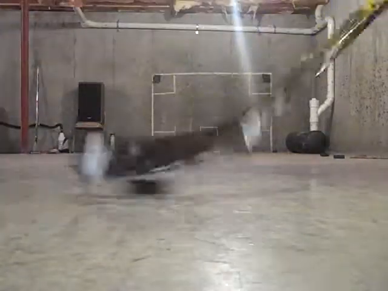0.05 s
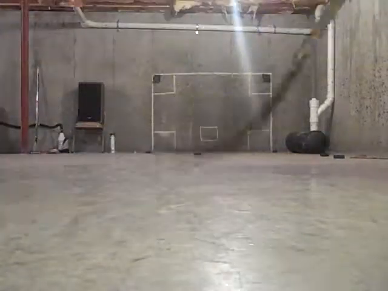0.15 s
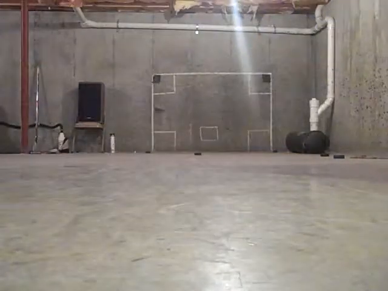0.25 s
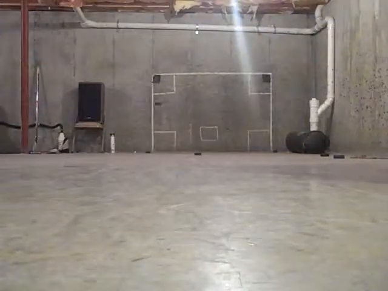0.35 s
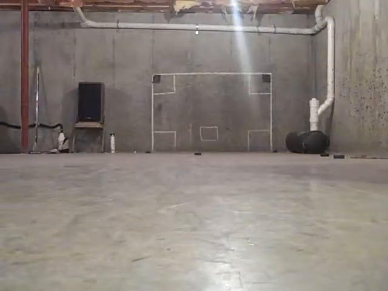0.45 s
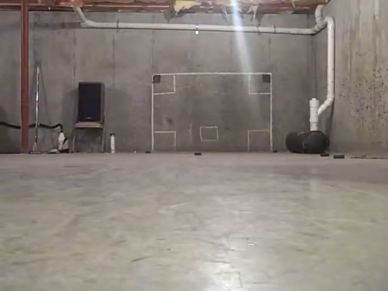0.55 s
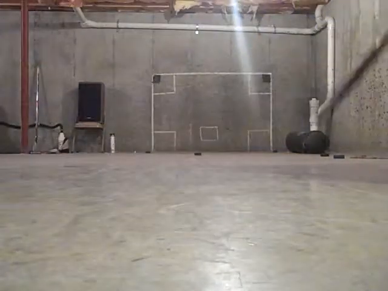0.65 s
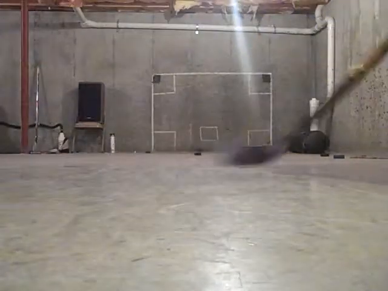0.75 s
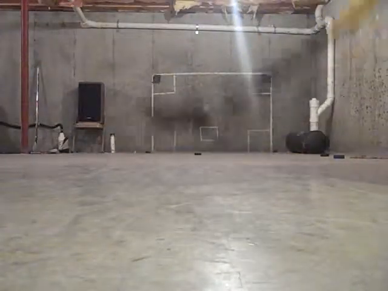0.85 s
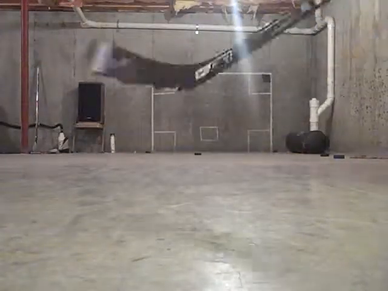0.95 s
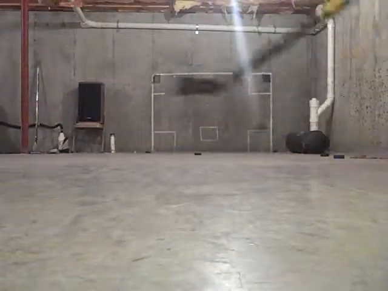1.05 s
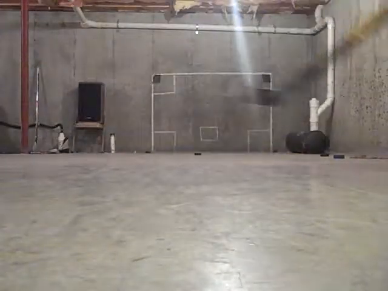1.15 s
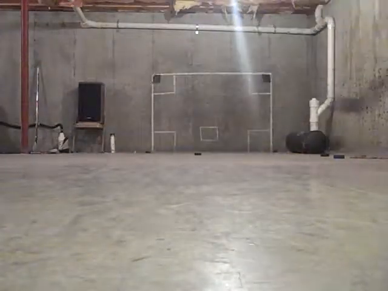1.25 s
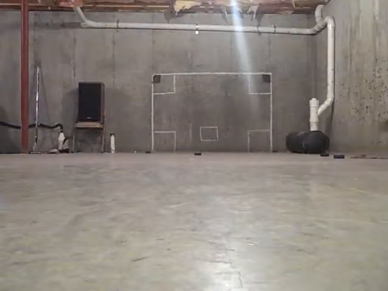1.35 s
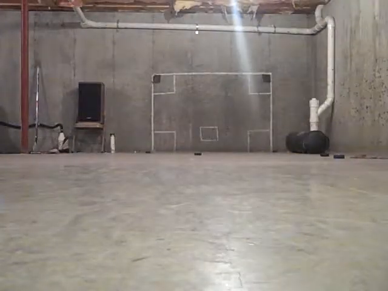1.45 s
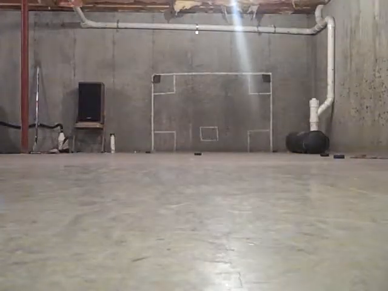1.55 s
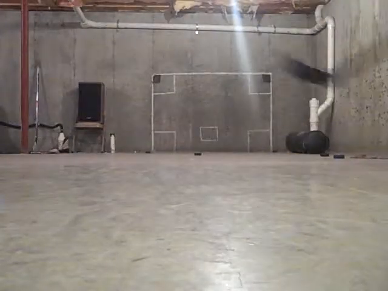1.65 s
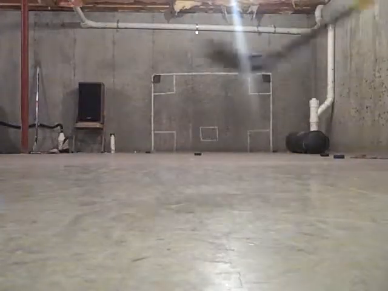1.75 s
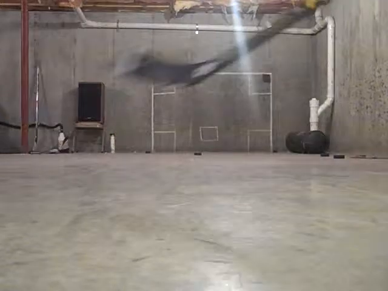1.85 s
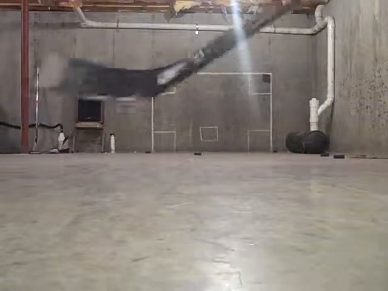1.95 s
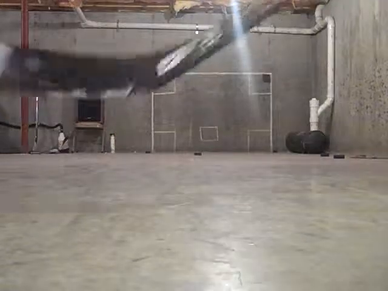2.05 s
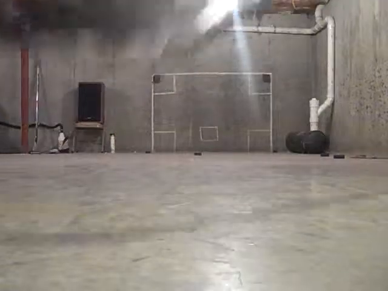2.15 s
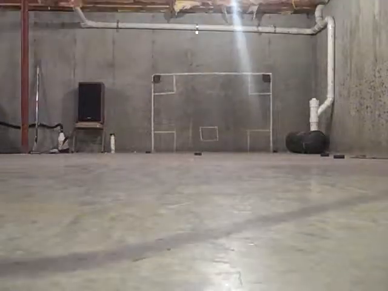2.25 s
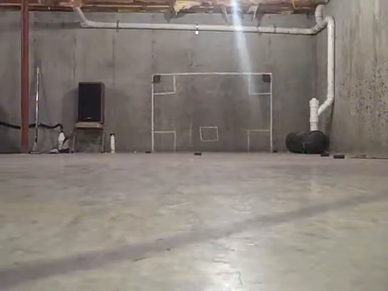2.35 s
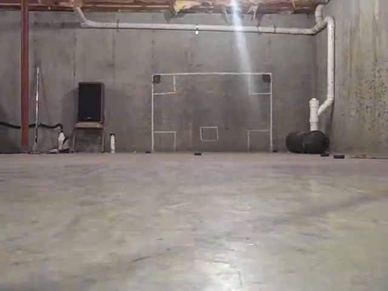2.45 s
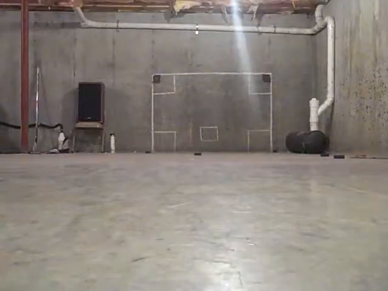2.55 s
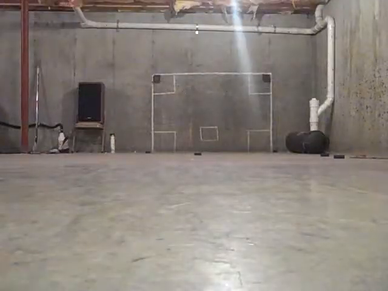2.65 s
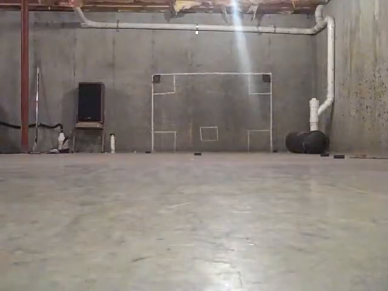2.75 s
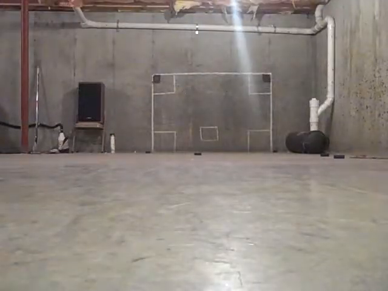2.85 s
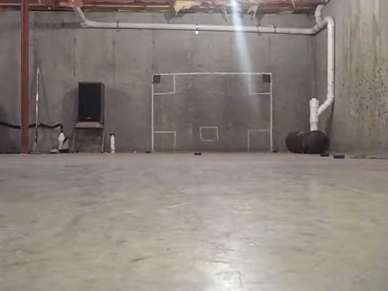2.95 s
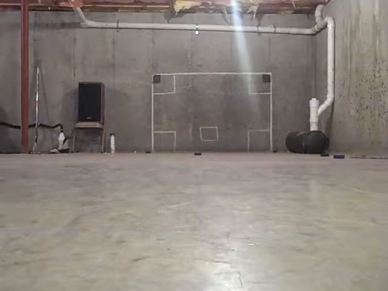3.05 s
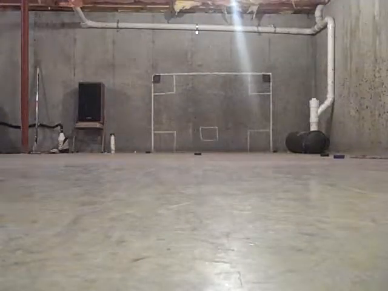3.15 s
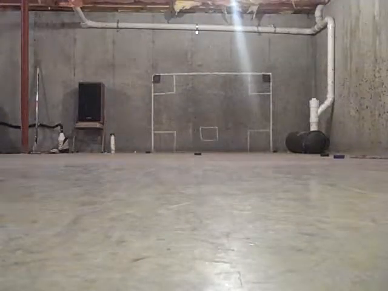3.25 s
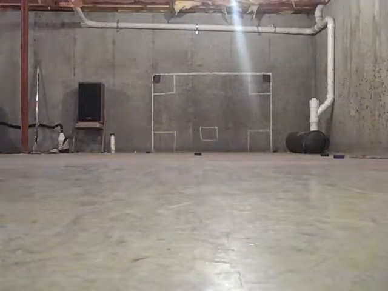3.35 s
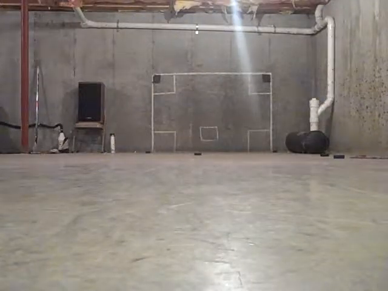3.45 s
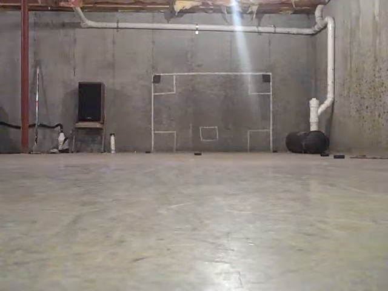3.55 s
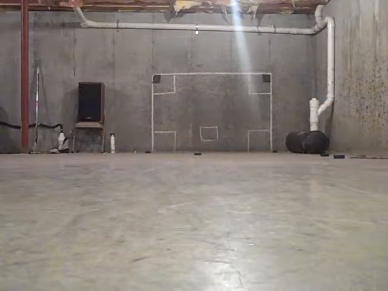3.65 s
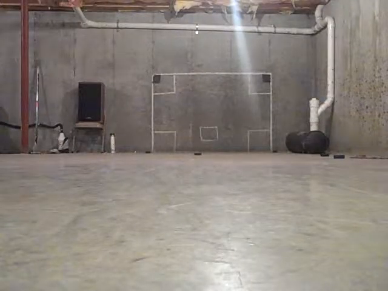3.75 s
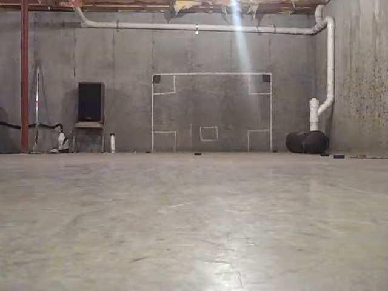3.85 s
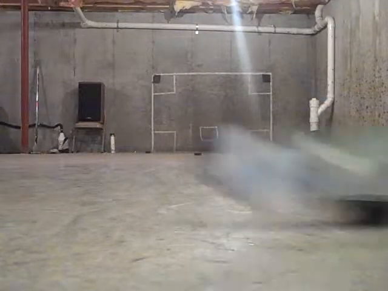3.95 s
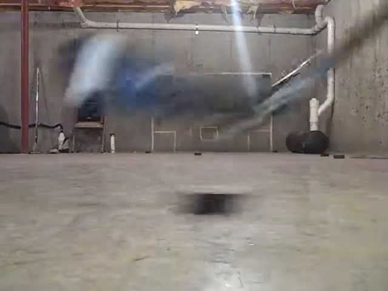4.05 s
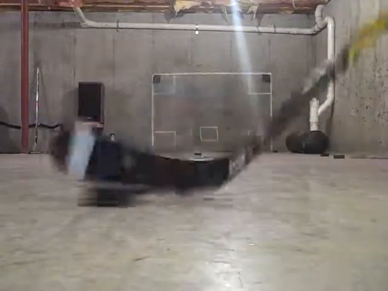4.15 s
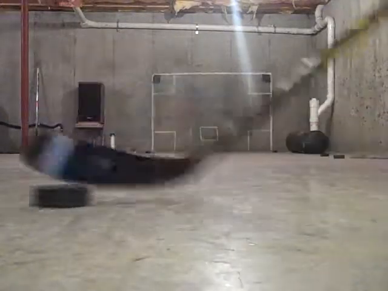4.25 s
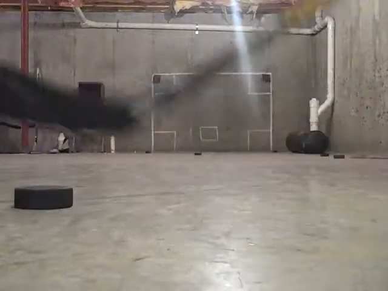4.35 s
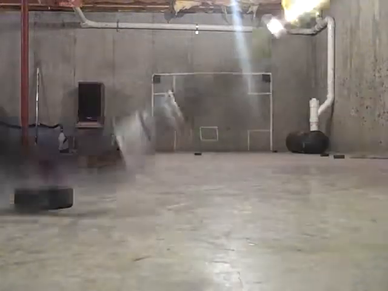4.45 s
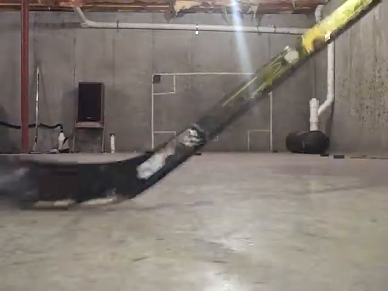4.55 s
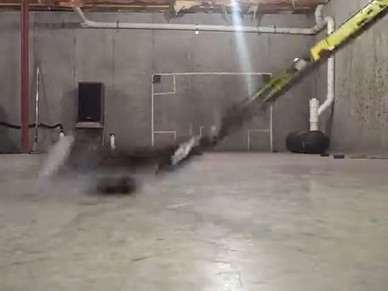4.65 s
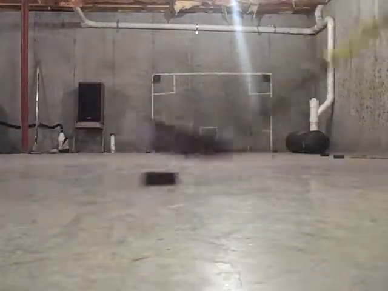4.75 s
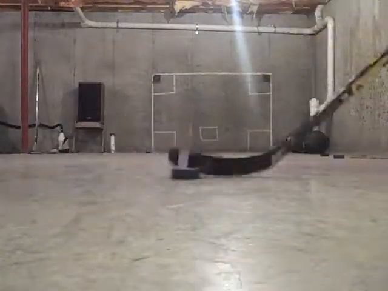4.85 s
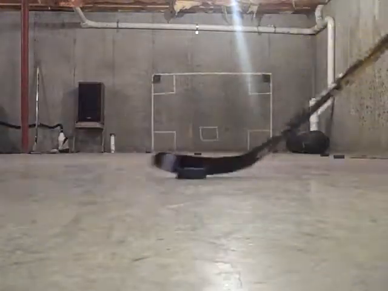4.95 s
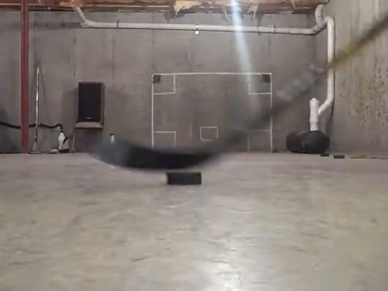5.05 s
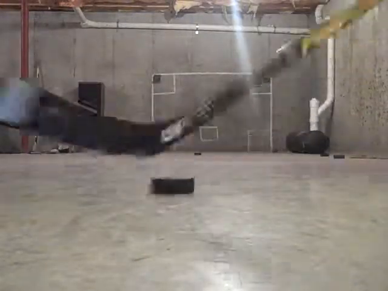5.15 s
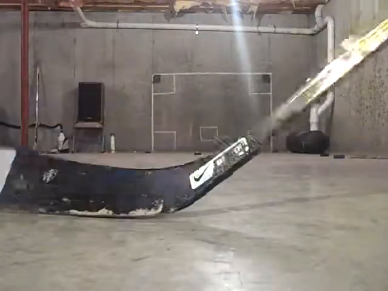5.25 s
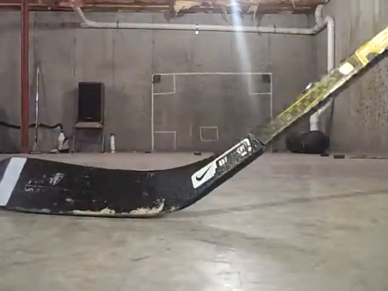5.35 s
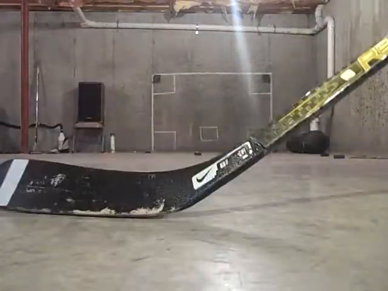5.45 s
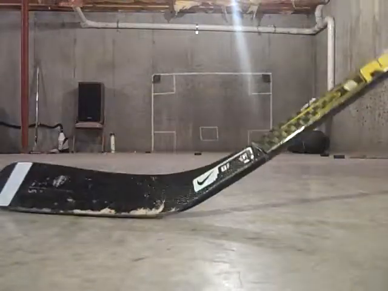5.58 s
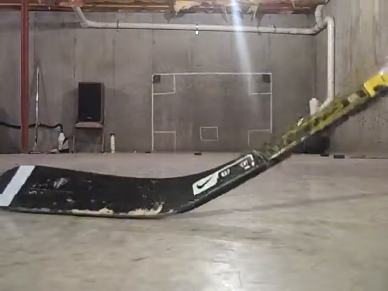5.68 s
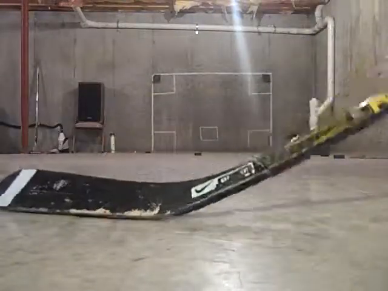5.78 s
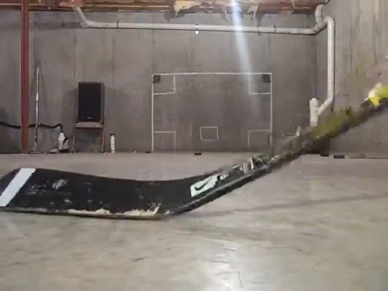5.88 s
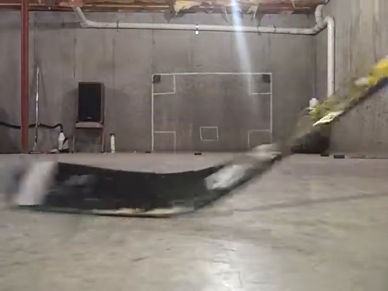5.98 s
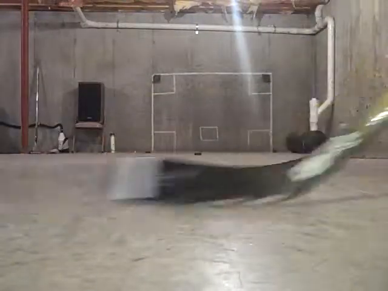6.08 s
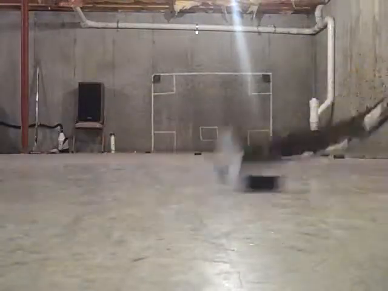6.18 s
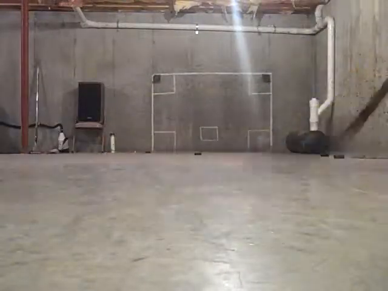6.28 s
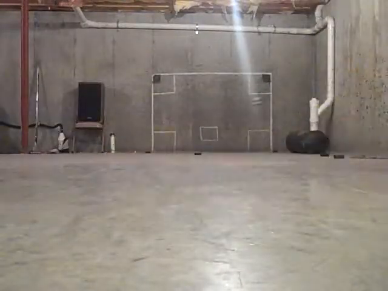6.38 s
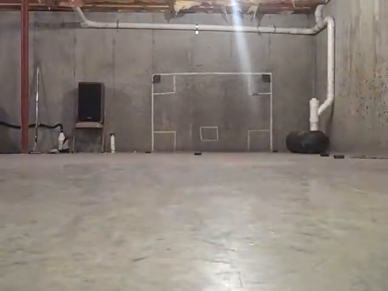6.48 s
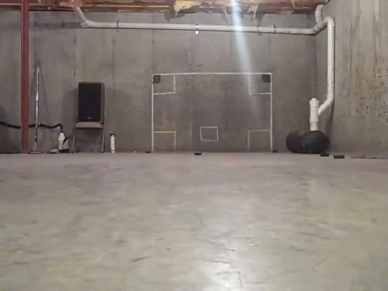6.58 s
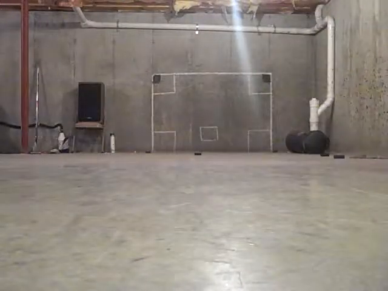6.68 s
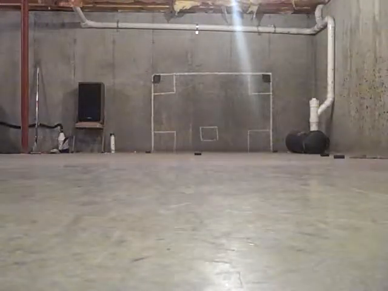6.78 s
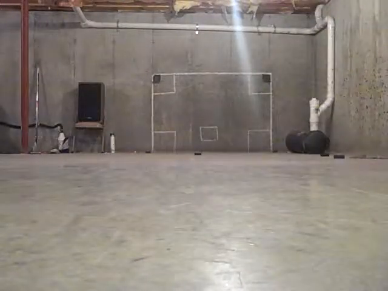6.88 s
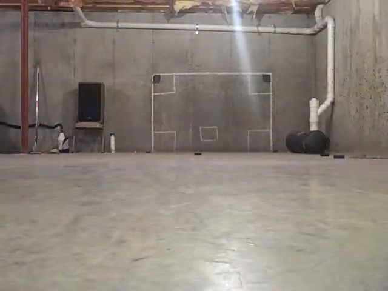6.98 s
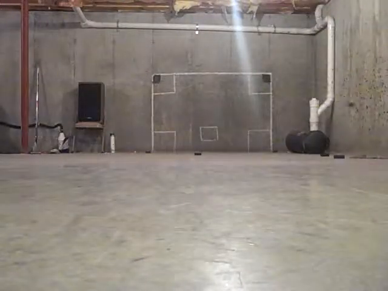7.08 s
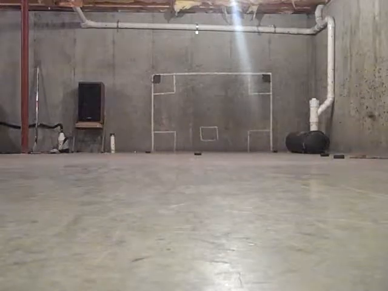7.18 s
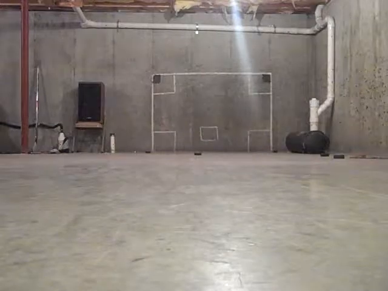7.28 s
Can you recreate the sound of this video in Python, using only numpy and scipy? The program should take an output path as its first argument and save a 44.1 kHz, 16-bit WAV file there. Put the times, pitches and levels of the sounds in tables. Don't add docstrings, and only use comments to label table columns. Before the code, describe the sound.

A small microphone lies on a bare concrete basement floor beside a hockey stick. From 0 s the blade hisses through a gritty sweep, slaps and skids at 0.2, and a puck bangs the far wall, with a heavy rebound near 0.55. Hard clicks and low thuds follow at 0.8 and 1.3, a board-like knock at 1.6, then small bounces and faint glides until 2.9. Sharp clacks at 3.25 lead to a quick scrape at 3.4 and soft sliding. Between 3.9 and 5.5 come close slaps and puck knocks, the loudest around 4.3, 4.6 and 5.3, distorting with gusts of air. A rough wind-up scrapes from 6.0 to 6.25; a violent slap at 6.33 sends pucks to the wall at 6.4 and 6.7. A hollow box booms near 6.87, a pipe rings faintly, and a last bounce lands at 7.3. Flutter echoes and a short tail sit over faint hum and hiss.

```python
import sys
import numpy as np
from scipy import signal
from scipy.fft import rfft, irfft
from scipy.io import wavfile
from scipy.ndimage import uniform_filter1d

SR = 44100
rng = np.random.default_rng(int(sys.argv[2]) if len(sys.argv) > 2 else 0)


def to_linear_factor(level_db):
    exponent = np.asarray(level_db, float) / 20
    return 10 ** exponent


def digitize_waveform(pressure):
    field = np.atleast_2d(pressure).T
    bounded = np.clip(field, -1, 1)
    quanta = np.round(bounded * 32767).astype(np.int16)
    wavfile.write(sys.argv[1], SR, quanta)


N = 322812

# hz, level_db, t60_s
RUBBER = [(540, 3.5, 0.0028), (900, -10.5, 0.029), (1274, -3, 0.01), (2330, -4, 0.00088)]
# ratio to the pitch, level_db
SLAB = [(.55, -9.5), (.75, -5), (1, 4), (1.2, -4), (1.5, -6.5), (1.9, -7.5), (2.5, -9.5)]
# hz, level_db
CLICK_KNOCK = [(100, -22.5), (300, -11.5), (600, -1), (1000, 0.5), (1600, -2.5), (2500, -12.5),
               (5000, -24.5)]
# hz, level_db
FAR_DULL = [(100, 0), (8500, 0), (10500, -7), (14000, -14)]
# hz, level_db
CAPSULE = [(30, -6.5), (3500, 1.5), (5500, 1.5), (7000, 7), (8100, 6.5), (9200, -2), (14000, -12.5)]
# hz, level_db, t60_s
PIPE = [(3042, -5, .4), (3254, 0, .55), (3261, -5, .55), (3512, -2, .55), (3545, -5, .5), (4422, -1, .65),
        (4430, -6, .6), (4815, -2, .35), (4826, -3, .35), (5163, -8, .3)]
# hz, level_db, t60_s
BOX = [(82.3, -10.5, 0.47), (167, 4.5, .06), (207, -20, .4), (249, -15.5, 0.42), (391, -20, 0.17)]
# hz, level_db, t60_s
JOISTS = [(62, -6.5, 0.46), (88.6, 2.5, .45), (120, -2.5, .35)]
# hz, level_db, t60_s
BOARD = [(385, -6.5, 0.052), (642, -14.5, 0.061), (915, -4, 0.14), (1400, -15, 0.11), (2200, -1.5, 0.044)]

BLADE_LAG, PUCK_LAG = 1, 3


def table(rows, hz, column=1):
    rows = np.array(rows, float)
    return np.interp(np.log(hz + 1), np.log(rows[:, 0] + 1), rows[:, column])


def response(rows):
    cepstrum = irfft(np.log(to_linear_factor(table(rows, np.fft.rfftfreq(1024, 1 / SR)))))
    cepstrum[1:512] *= 2
    cepstrum[513:] = 0
    return irfft(np.exp(rfft(cepstrum)))[:512]


def colour(x, h):
    return signal.oaconvolve(x, h[None], axes=1)[:, :x.shape[1]]


def unit(x):
    return x / np.sqrt(np.mean(x ** 2))


def peak(x, db):
    return x * to_linear_factor(db) / np.abs(x).max()


def add(track, s, x):
    i = int(s * SR)
    track[..., i:i + x.shape[-1]] += x[..., :N - i]


def smooth_noise(size, samples):
    once = uniform_filter1d(rng.standard_normal(size), size=samples)
    return unit(uniform_filter1d(once, size=samples))


def two_ports(size, unlike):
    mid, side = rng.standard_normal((2, size))
    return mid + unlike * np.array([side, -side])


def aside(x, lag):
    left, right = np.broadcast_to(x, (2, N))
    return np.array([np.roll(left, lag), right])


def ring(modes, scatter_db, size=8192, detune=0.023):
    t = np.arange(size) / SR
    out = np.zeros(size)
    for hz, db, t60 in modes:
        level_chance, pitch_chance = rng.standard_normal(2)
        decay = np.exp(-np.log(1000) * t / t60)
        tone = np.sin(2 * np.pi * hz * (1 + detune * pitch_chance) * t)
        out += to_linear_factor(db + scatter_db * level_chance) * decay * tone
    return out


def hits(rows, modes, knock, ms, ring_db, chatter, unlike, wet_db=0):
    # hz, level_db
    crack_shape = [(1500, -26.5), (2500, 15), (4000, 24.5), (6000, 19.5), (9000, 15), (14000, 15)]
    crack = response(crack_shape)
    crack_share = 0.77
    onset_delay_s = 0.001
    direct, send = np.zeros((2, N)), np.zeros(N)
    t = np.arange(2048) / SR
    fade = np.exp(-t / (ms / 1000))
    crack_fade = np.exp(-t / (ms / 1000) * (1 / crack_share - 1))
    for s, db, crack_db, hz, *own_db in rows:
        room_db = wet_db + sum(own_db)
        contacts = chatter * two_ports(len(t), unlike) * fade
        contacts[:, 0] = -1
        body = response(np.array(knock) * [hz / 1000, 1])
        dull = peak(colour(contacts, body), db)
        rung = peak(colour(contacts, ring(modes, scatter_db=2, size=2048)), db + ring_db)
        sharp = peak(colour(contacts * crack_fade, crack), db + crack_db)
        add(direct, s + onset_delay_s, dull + rung + sharp)
        add(send, s + onset_delay_s, rung[0] * to_linear_factor(room_db - 2.5))
        for part, h in ((dull, body), (sharp, crack)):
            add(send, s + onset_delay_s, h * np.linalg.norm(part[0]) / np.linalg.norm(h) * to_linear_factor(room_db))
    return direct, send


def stick():
    # hz, level_db, t60_s
    blade = [(428, -20.5, 0.024), (827, 8.5, 0.02), (1120, -1, 0.052), (1500, 8.5, 0.0097),
             (1930, 7.5, 0.0081), (2640, -9, 0.014)]
    # hz, level_db
    skid_knock = [(60, -27), (300, -12), (600, -6), (900, 2.5), (1400, -2.5), (2200, -3), (3500, -9.5),
                  (6000, -28)]
    blade_knock = [(100, -8.5), (300, -14), (600, -3), (900, 3.5), (1400, -3.5), (2200, -10.5),
                   (3500, -7.5), (6000, -27.5)]
    # start_s,
    # peak_db, crack_db, knock_hz, room_db
    skids = [(0.184, -3.5, -29, 2060, -19), (0.186, 5.5, 4, 734, -11), (0.2085, 6, -21, 890, -10.5),
             (1.581, 1, -27, 1056, -12), (3.857, -6.5, -25, 1000, -3.5), (3.902, -16, -22, 1500, -8),
             (6.347, 5.5, -8, 1310, -24)]
    slaps = [(6.3285, -9, 2, 1200, -16.5), (1.619, -17, 2.5, 635, -1), (3.969, 2.5, -6, 845, -3),
             (3.977, -3.5, -26.5, 820, -6), (4.264, 13.5, -16.5, 823, -25.5),
             (4.281, 2.5, -16.5, 1150, -11.5), (4.583, 13, -19, 1395, -15.5), (4.654, -4.5, -21, 953, -9),
             (4.929, 1.5, -9, 800, -3), (5.003, -3.5, 0, 830, -11.5), (5.342, 12.5, -11, 1206, -17),
             (5.351, 0.5, -36, 824, -16), (5.483, -9, -16.5, 570, -7), (6.332, 14.5, -40, 1044, -10.5),
             (6.336, 1.5, 13.5, 1140, -22), (6.343, 10, 3.5, 1410, -9.5), (6.514, -20.5, -19, 1500, 10)]
    # start_s, peak_db, crack_db, knock_hz
    ticks = [(3.36, -30, 9, 2040), (3.394, -30, 12, 1330), (3.4, -29, 5, 2030), (4.5565, -38, 9, 2000),
             (4.626, -8, -6, 1450), (4.754, -20.5, 1, 2000), (5.389, -18.5, -17, 1850),
             (5.797, -29, 10, 1180), (5.953, -26.5, 4.5, 1810), (5.958, -29, -17, 1750),
             (6.076, -16, -28, 490), (6.137, -15, -12, 1120), (6.168, -17, 0, 1134), (6.194, -21, -8, 1120),
             (6.241, -23, -15, 2040)]
    kinds = [(skids, skid_knock, 11.7, 0),
             (slaps, blade_knock, 4.85, 0),
             (ticks, blade_knock, 3.9, -16)]
    parts = [hits(rows, blade, knock, ms, ring_db=-4, chatter=0.25, unlike=0.61, wet_db=wet_db)
             for rows, knock, ms, wet_db in kinds]
    return sum(p[0] for p in parts), sum(p[1] for p in parts)


def scrapes():
    # hz, level_db
    grit_shape = [(1500, -17), (3000, -4), (4000, -3.5), (4900, -0.5), (5700, 1), (8000, 1.5),
                  (10000, -1.5), (14000, -10)]
    rasp_shape = [(300, -13), (900, -6.5), (1150, 1), (1450, 3), (2200, -1), (3500, -6.5), (6000, -27.5)]
    # hz, level_db, t60_s
    singing = [(1140, 1, 0.019), (2260, -8, .01), (3520, -7.5, 0.015), (4830, 2, 0.011),
               (5800, -1.5, 0.0097), (7080, 0, 0.014), (8080, 0.5, 0.022)]
    # hz, level_db
    smooth_glide = [(300, 0.5), (3600, 0.5), (4400, -5), (5200, -10), (6000, -1), (7000, 1), (14000, -1.5)]
    # start_s, rise_db, length_ms
    snags = [(.027, 5, 0.69), (.074, 3, 2.3), (.082, 8.5, 1), (0.101, 4, 1.3), (.11, 4.5, 2.9),
             (.12, -1, 0.91), (3.4, 2, 1.5), (6.129, 2, 1), (6.139, 9, 1.2), (6.148, 4, 1.5), (6.156, 5, 2),
             (6.169, 9.5, 3.2), (6.179, 10, 1.6), (6.196, 12, 1.1), (6.243, 8.5, 3.2)]
    # time_s, hiss_db
    sweeps = [
        [(0.0, -30), (0.064, -30), (0.08, -26), (0.127, -31), (0.133, -57.5), (0.18, -53.5)],
        [(3.352, -48), (3.356, -30), (3.375, -32.5), (3.392, -31), (3.401, -19.5), (3.407, -25.5),
         (3.42, -46.5)],
        [(5.99, -55), (6.035, -39), (6.08, -29), (6.165, -24), (6.206, -30), (6.246, -25.5), (6.262, -35),
         (6.274, -52), (6.32, -49)],
    ]
    sweep_rasp_db = [-2, -19.5, -7]
    # full_s, length_s, hiss_db, rasp_db against hiss
    slides = [(1.217, 0.077, -48, -28), (2.273, 0.22, -53.5, -6), (2.571, 0.045, -47, -6.5),
              (2.871, 0.2, -44.5, -9.5), (3.426, 0.076, -38.5, -26), (3.617, 0.31, -44, -17),
              (4.075, 0.2, -44, -16), (4.525, 0.11, -49, -16), (5.058, 0.11, -42, 2.5),
              (5.297, 0.12, -46.5, -15), (5.749, 0.12, -41, -8), (6.53, 0.11, -45.5, -15)]
    scuffs = [(1.6, 0.047, -40, -11), (1.806, 0.017, -48, -21.5), (3.955, 0.013, -31.5, 0),
              (4.605, 0.042, -30.5, 11.5), (4.943, 0.038, -33.5, 9), (5.62, 0.011, -44.5, 3)]
    singing_db = 1
    patchy_db = 3.5
    pitch_drift = 0.04

    t = np.arange(N) / SR
    near, far = np.zeros((2, 2, N))
    grit = two_ports(N, unlike=0.42) * to_linear_factor(2.0 * rng.exponential(size=N))
    hiss = unit(to_linear_factor(1.5 * smooth_noise(N, 120)) * colour(grit, response(grit_shape)))
    rasp = unit(to_linear_factor(1.5 * smooth_noise(N, 120)) * colour(grit[:, ::-1], response(rasp_shape)))
    angle = smooth_noise(N, 500)
    place = np.clip(np.cumsum(1 + pitch_drift * angle), 0, N - 1)
    tones = np.zeros((2, N))
    for k, mode in enumerate(singing):
        swell = to_linear_factor(patchy_db * np.roll(angle, 9000 * (k + 1)))
        tones += swell * colour(grit, ring([mode], scatter_db=0, size=2048, detune=0))
    sung = unit(np.array([np.interp(place, np.arange(N), x) for x in tones]))
    snag_db = sum(db * np.exp(-((t - s) * 1000 / ms) ** 2) for s, db, ms in snags)

    for rows, rasp_db in zip(sweeps, sweep_rasp_db):
        level = to_linear_factor(np.interp(t, *np.transpose(rows), -200, -200) + snag_db)
        near += level * (hiss + to_linear_factor(rasp_db) * rasp + to_linear_factor(singing_db - snag_db / 2) * sung)
    for out, rows, rise, fall in ((far, slides, 220, 254), (near, scuffs, 894, 701)):
        for s, length, hiss_db, rasp_db in rows:
            on = slice(int((s - .2) * SR), int((s + length + .2) * SR))
            before = np.maximum(s - t[on], 0)
            after = np.maximum(t[on] - s - length, 0)
            db = hiss_db - rise * before - fall * after
            out[:, on] += to_linear_factor(db) * (hiss[:, on] + to_linear_factor(min(rasp_db, 4)) * rasp[:, on])
    return aside(near, BLADE_LAG) + aside(colour(far, response(smooth_glide)), PUCK_LAG)


def clicks():
    # start_s, peak_db, crack_db, knock_hz, room_db
    click_rows = [(0.2085, -1.5, 5, 900, -4.5), (0.788, -7.5, -2.5, 1000, -3.5),
                  (0.7925, -23, 9.5, 1500, -19), (0.9175, -23, 8, 1500, -1), (1.32, -13, -15.5, 900, -5.5),
                  (1.3285, -2, -2, 1330, -4), (1.3595, -12.5, 4, 1500, -15), (1.4225, -30, -12, 1500, -20),
                  (1.796, -20, -9, 900, -11), (1.852, -19.5, -1.5, 2000, -8),
                  (1.911, -19.5, 8.5, 1500, -22), (2.031, -22, -9, 1800, -9),
                  (2.5462, -14, -12, 2200, -15.5), (3.2508, 1.5, 0, 1220, -9.5),
                  (3.2572, -2, 10, 1180, -12), (3.2595, -0.5, -2, 1500, -14), (3.2668, -5.5, 3, 1300, -11),
                  (3.281, -22, -8, 1300, -11), (3.311, -31, -8, 1200, -17), (4.2785, 5.5, -13.5, 1270, -9),
                  (4.2945, 0, -25, 1120, -14), (4.5775, -2.5, -7.5, 900, -20),
                  (4.651, 10.5, -13.5, 816, -11.5), (4.926, 7, 4, 1000, -12.5), (5.0015, 7.5, 0, 1000, -14),
                  (5.008, 5, -13, 860, -6.5), (5.4805, 2, -4.5, 820, -13), (5.348, -1.5, -6.5, 1000, -15.5),
                  (5.352, -4, -8, 1000, -17), (6.7125, 4.5, -5, 1130, -8), (4.269, 2, 0, 1000, -17),
                  (3.354, -24, 3, 2000, -9)]
    return hits(click_rows, RUBBER, CLICK_KNOCK, ms=0.76, ring_db=-7.5, chatter=0.28, unlike=0.44)


def wall_bangs():
    # start_s, peak_db, crack_db, knock_hz
    bang_rows = [
        (0.232, -4.5, -12, 1800),
        (6.39, 0, -13, 1740),
        (0.5575, 8.5, -8.5, 895),
        (6.712, 6, -4, 940),
    ]
    # hz, level_db
    wall_knock = [(100, -14), (300, -10.5), (600, 0.5), (1000, -1.5), (1700, -1.5), (2500, -10),
                  (4000, -25)]
    return hits(bang_rows, RUBBER, wall_knock, ms=3.35, ring_db=-1.5, chatter=0.1, unlike=0.61, wet_db=-4.5)


def bounces():
    # start_s, peak_db, crack_db, knock_hz
    bounce_rows = [(0.802, -16.5, -16, 900), (1.913, -18, 0.5, 528), (1.959, -26, -10, 685),
                   (2.142, -25, -18, 675), (2.156, -27.5, -2, 940), (2.56, -25.5, -22, 526),
                   (2.758, -35, -24, 510), (3.577, -42.5, 10, 504), (3.672, -28, -12, 690),
                   (3.757, -24.5, -18, 520), (5.24, -18, -3.5, 548), (6.747, -8.5, -20, 1050),
                   (6.774, -8.5, -20, 1000), (6.865, -15.5, 3.5, 1120), (6.872, -17.5, 9.5, 503),
                   (6.926, -28, 15, 655), (7.304, -19.5, -3.5, 622)]
    # hz, level_db
    rubber_knock = [(100, -12), (250, -16), (500, -1.5), (900, 6), (1400, -4), (2200, -10.5), (3200, -8),
                    (6000, -21)]
    return hits(bounce_rows, RUBBER, rubber_knock, ms=3, ring_db=-5.5, chatter=0.23, unlike=0.51, wet_db=-3)


def thuds():
    # start_s, peak_db, pitch_hz, room_db, ring in cycles
    thud_rows = [(0.558, -5.5, 229, -10.5, 8.9), (0.786, -15.5, 178, -7, 6.6),
                 (0.917, -19.5, 315.8, -7.5, 9.7), (1.32, -23.5, 115, -10, 13.4), (1.581, -19, 397, -3, 18),
                 (1.66, -21.5, 190, -9, 8.4), (1.795, -26.5, 427, -10, 13), (1.851, -17.5, 212, -12, 5.2),
                 (1.9145, -4, 364, -17, 3), (1.964, -19.5, 189, -11, 9.8), (2.03, -19, 195, -16, 6),
                 (2.548, -15.5, 502, -18, 5.8), (3.25, -12.5, 428, -14, 23), (3.669, -30.5, 267, -9, 7.3),
                 (3.757, -27, 282, -14, 9.8), (3.968, -11.5, 440, -10, 33), (4.265, -6.5, 435, -15, 28),
                 (4.652, -20.5, 428, 0.5, 12), (4.926, -11, 498, -15, 20), (5.24, -18.5, 162, -15.5, 8.7),
                 (5.48, -3.5, 513, -21, 9), (5.56, -32, 106, -16, 14), (6.076, -13, 493, -14.5, 8.1),
                 (6.71, -14, 174.3, -9, 12.7), (6.896, -11.5, 130.7, -4, 6.7),
                 (7.304, -19.5, 234, -11.5, 16)]
    direct, send = np.zeros(N), np.zeros(N)
    t = np.arange(8192) / SR
    for s, db, hz, room_db, cycles in thud_rows:
        t60 = 0.02 + cycles / hz
        boom = ring([(ratio * hz, level_db, t60) for ratio, level_db in SLAB], scatter_db=2.5)
        boom = peak(boom * (1 - np.exp(-t * hz * 3)), db)
        add(direct, s, boom)
        add(send, s, boom * to_linear_factor(room_db))
    return direct, send


def struck():
    # start_s, peak_db, body
    struck_rows = [
        (6.925, -25, PIPE),
        (6.866, -3.5, BOX),
        (1.582, -7, BOARD),
        (1.664, -23, BOARD),
        (0.44, -30, JOISTS),
        (1.4, -34, JOISTS),
        (3.1, -33, JOISTS),
        (3, -38.5, JOISTS),
        (6, -36, JOISTS),
    ]
    out = np.zeros(N)
    t = np.arange(16384) / SR
    for s, db, modes in struck_rows:
        body = ring(modes, scatter_db=-0.5, size=len(t), detune=0)
        add(out, s, -peak(body * (1 - np.exp(-t / .002)), db))
    return out


def rumbles():
    rumble_s = [.605, .69, .797, .83, .918, .99, 1.335, 1.64, 1.69, 1.862, 1.868, 1.925, 1.94, 1.98, 1.995,
                2.055, 2.15, 3.3, 6.94, 6.99]
    # peak_db, pitch_hz, ring in cycles
    rumble_rows = [(-20, 105, 5), (-27, 68, 4), (-15.5, 170, 5), (-29, 80, 8), (-21.5, 150, 6),
                   (-30, 88, 8), (-26, 90, 7.3), (-20, 334, 8), (-21, 350, 8.9), (-25, 490, 10),
                   (-26, 190, 5), (-20, 150, 6), (-20.5, 430, 14), (-25, 300, 10), (-26, 200, 5),
                   (-31, 300, 6), (-30, 384, 10), (-30, 100, 11), (-22, 236, 10), (-22, 82, 8)]
    out = np.zeros(N)
    t = np.arange(8192) / SR
    for s, (db, hz, cycles) in zip(rumble_s, rumble_rows):
        t60 = 2 * cycles / hz
        boom = ring([(ratio * hz, level_db, t60) for ratio, level_db in SLAB[1:4]], scatter_db=0.5)
        add(out, s, peak(boom * (1 - np.exp(-t * hz * 1.2)), db))
    return out


def returns():
    return_s = [.565, .572, 1.361, 2.033, 2.046, 3.354, 4.016, 4.078, 4.139, 5.2405, 6.241, 6.351, 6.4,
                6.705, 6.719, 6.775, 6.964]
    # peak_db, crack_db, knock_hz
    return_rows = [(-6, -18, 840), (-7, -18, 700), (-14, -14, 2200), (-26, -15, 840), (-26, -15, 490),
                   (-22, 0, 2000), (-9, -20, 1200), (-15.5, -20, 1300), (-17.5, -20, 1200),
                   (-15.5, -15, 430), (-10.5, -14, 2300), (2, -7, 1200), (-6, -14, 1500), (-20, -18, 700),
                   (-7, -18, 700), (-13, -14, 1100), (-28, 9, 1500)]
    rows = [(s, *row) for s, row in zip(return_s, return_rows)]
    direct, _ = hits(rows, RUBBER, CLICK_KNOCK, ms=1.6, ring_db=-7, chatter=.3, unlike=0.4)
    return colour(direct, response(FAR_DULL))


def gusts():
    gust_s = [.186, 3.970, 4.265, 4.5792, 4.927, 5.003, 5.343, 5.481, 6.168, 6.3295]
    # level_db, length_ms, sign, left minus right_db
    gust_rows = [(-10.5, 7.4, -1, -11), (-15.5, 4.1, -1, -2), (-6.5, 2.6, -1, 16), (7.5, 6.2, 1, 4),
                 (-39.5, 12, -1, 3.5), (-21, 4.7, -1, 18), (-30, 2.2, -1, 1), (-21.5, 3.9, -1, 13.5),
                 (-26, 4.9, 1, 23), (-2, 11, -1, 8)]
    out = np.zeros((2, N))
    t = np.arange(8192) / SR
    for s, (db, ms, sign, pan_db) in zip(gust_s, gust_rows):
        u = t / (ms / 1000)
        swing_back = 1.27 * (u > 1) * np.exp(-(u - 1) / 1.4)
        push = np.sin(np.pi * np.minimum(u, 1)) - swing_back
        add(out, s, sign * to_linear_factor(db + np.array([[pan_db], [-pan_db]]) / 2) * push)
    return out


def pair(size):
    # hz, likeness 0-1
    likeness = [(60, 0.76), (500, 0.99), (1000, 0.89), (1700, 0.6), (3000, 0.35), (5000, 0), (14000, 0.36)]
    mid, side = rfft(rng.standard_normal((2, size)))
    alike = np.clip(table(likeness, np.fft.rfftfreq(size, 1 / SR)), 0, 1)
    return irfft([np.sqrt(1 + alike) * mid + k * np.sqrt(1 - alike) * side for k in (1, -1)], size)


def cellar(send, echo_s, echo_db, loss_db, build_s, smear):
    # hz, t60_s, level_db
    bands = [(56, 0.84, -7), (124, 0.56, 2.5), (262, 0.57, 2), (510, 0.63, 0), (1000, 0.59, -1),
             (2000, 0.65, -2), (3660, 0.68, -3.5), (8050, 0.33, -3.5), (12500, 0.15, -24)]
    size = 32768
    t, hz = np.arange(size) / SR, np.fft.rfftfreq(size, 1 / SR)
    noise = rfft(pair(size))
    tail = np.zeros((2, size))
    for k, (_, t60, db) in enumerate(bands):
        share = table([(row[0], j == k) for j, row in enumerate(bands)], hz)
        clumps = to_linear_factor(2.5 * smooth_noise(size, 150))
        tail += to_linear_factor(db) * clumps * irfft(noise * share, size) * np.exp(-np.log(1000) * t / t60)
    tail *= (1 - np.exp(-t / build_s)) * to_linear_factor(-30.5)
    dulling = signal.butter(4, 8000, fs=SR, output="sos")
    grain = np.arange(64)
    for k in range(4):
        i = int(echo_s * (k + 1) * SR)
        roughness = 1 + 0.37 * rng.standard_normal(64)
        bump = to_linear_factor(echo_db - k * loss_db) * roughness * grain / smear * np.exp(-grain / smear)
        tail[:, i:i + 64] += signal.sosfilt(dulling, bump)
    return signal.oaconvolve(send[None], tail, axes=1)[:, :N]


def hush():
    # hz, level_db per Hz
    hush_shape = [(15, -39), (25, -19.5), (90, 2.5), (361, -1.5), (895, -5.5), (1410, -13), (2100, -12.5),
                  (3490, -13), (5200, -23), (7780, -8.5), (9890, -20.5), (13600, -38), (14800, -33.5)]
    swell = to_linear_factor(2 * unit(uniform_filter1d(rng.standard_normal(N), size=9000)))
    hz = np.fft.rfftfreq(N, 1 / SR)
    shape = to_linear_factor(table(hush_shape, hz) - table(CAPSULE, hz))
    return to_linear_factor(-50) * swell * unit(irfft(rfft(pair(N)) * shape, N))


def scene():
    blade, blade_send = stick()
    drag = scrapes()
    click, click_send = clicks()
    wall, wall_send = wall_bangs()
    puck, puck_send = bounces()
    boom, boom_send = thuds()
    near_send = blade_send + click_send + puck_send + boom_send + to_linear_factor(-13.5) * drag.mean(axis=0)
    near = cellar(near_send, echo_s=.0465, echo_db=-25.5, loss_db=21.5, build_s=0.00031, smear=3.2)
    far = cellar(wall_send, echo_s=.0622, echo_db=-11, loss_db=2.5, build_s=0.00068, smear=0.94)
    far_things = colour(puck, response(FAR_DULL)) + boom + struck() + rumbles() + returns()
    direct = blade + drag + aside(click, BLADE_LAG) + wall + aside(far_things, PUCK_LAG)
    return direct + gusts() + near + far + hush()


def duck(x, top_db, ratio, attack_ms, release_ms):
    step = SR // 1000
    loud = uniform_filter1d(np.abs(x).mean(axis=0), size=step)[::step]
    level, held = 0., []
    for v in loud:
        level += (v - level) / (attack_ms if v > level else release_ms)
        held.append(level)
    gain = (to_linear_factor(top_db) / np.maximum(held, to_linear_factor(top_db))) ** (1 - 1 / ratio)
    return np.interp(np.arange(N), step * np.arange(len(loud)), gain)


def top_cut(x):
    return signal.sosfilt(signal.butter(12, 14910, fs=SR, output="sos"), x)


def record(dry):
    # hz, left minus right_db
    left_more = [(60, -1), (800, -1), (1200, -1), (1800, 1), (3000, 1.5), (6300, -1), (7600, 9.5),
                 (10000, 7.5), (13000, 16)]
    hz = np.fft.rfftfreq(N, 1 / SR)
    ports = to_linear_factor(table(CAPSULE, hz) + np.array([[.5], [-.5]]) * table(left_more, hz))
    ports /= 1 + (hz / 14250) ** 70
    x = irfft(rfft(dry) * ports, N)
    x *= duck(x, top_db=-14.0, ratio=2.04, attack_ms=18.3, release_ms=234)
    return top_cut(np.clip(x, -1, 1))


dry = scene()
out = record(dry)
digitize_waveform(out)
```